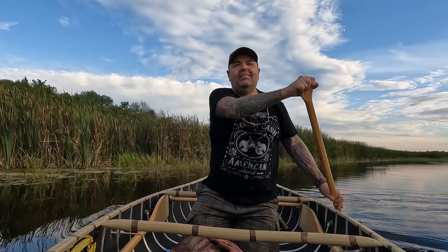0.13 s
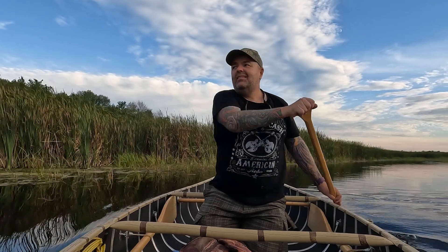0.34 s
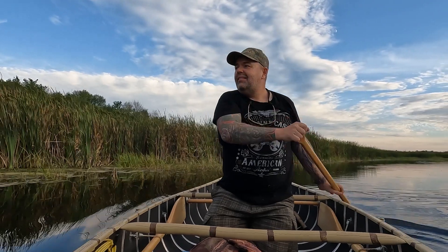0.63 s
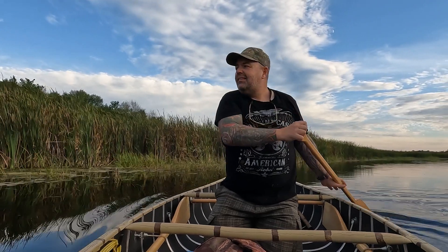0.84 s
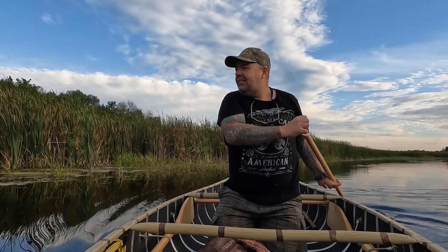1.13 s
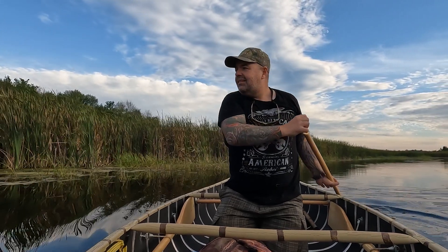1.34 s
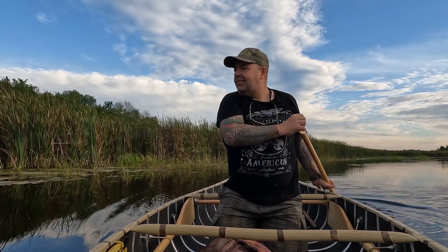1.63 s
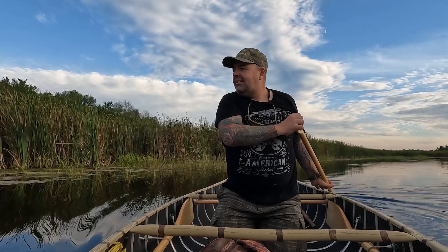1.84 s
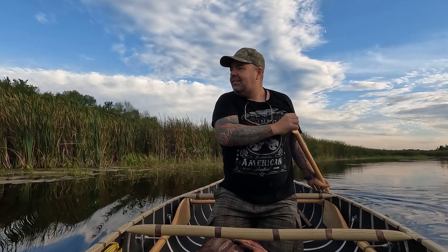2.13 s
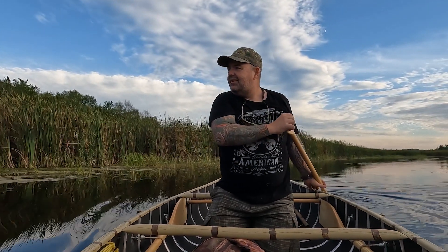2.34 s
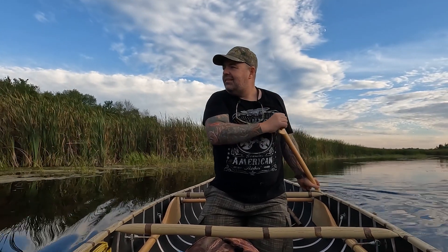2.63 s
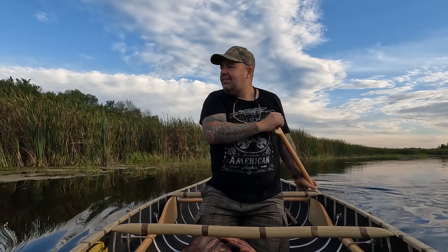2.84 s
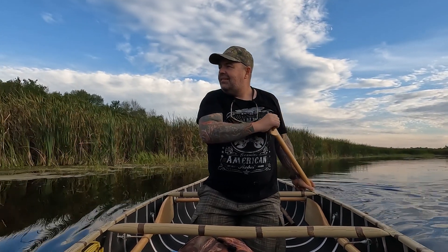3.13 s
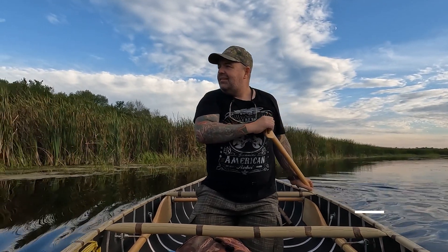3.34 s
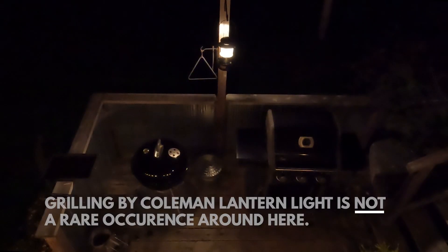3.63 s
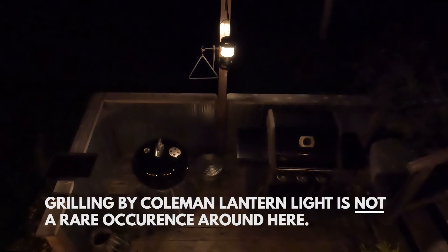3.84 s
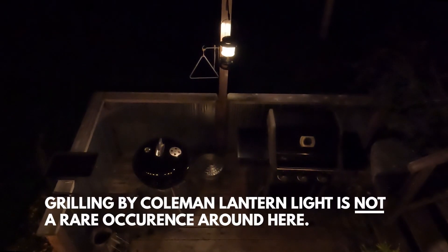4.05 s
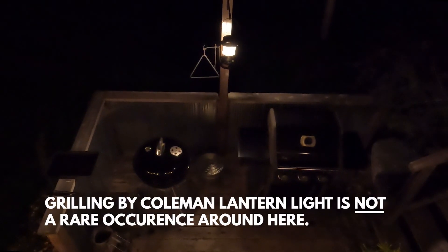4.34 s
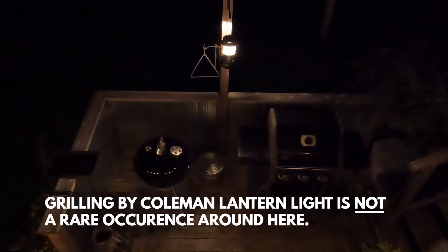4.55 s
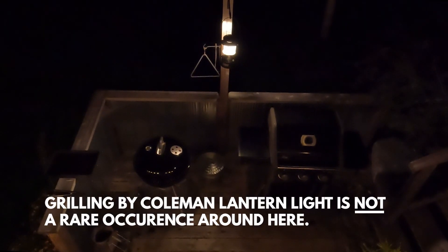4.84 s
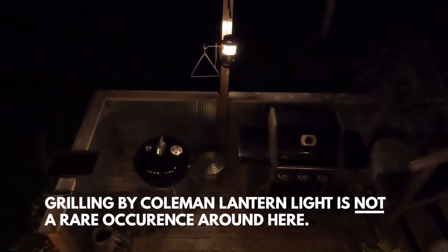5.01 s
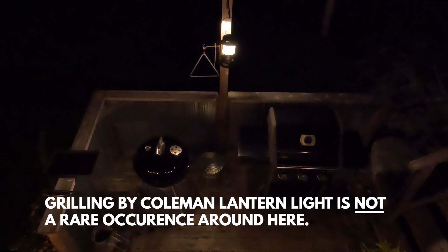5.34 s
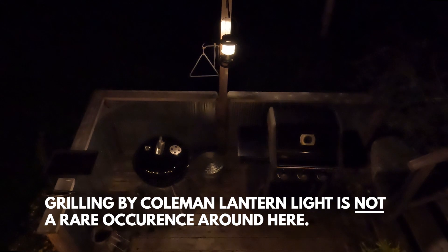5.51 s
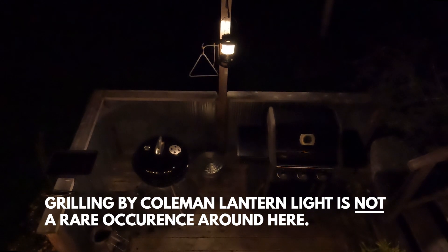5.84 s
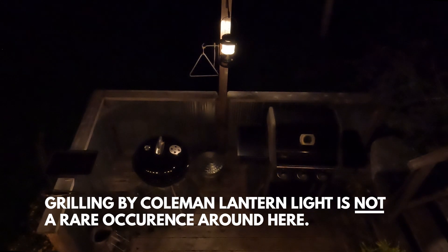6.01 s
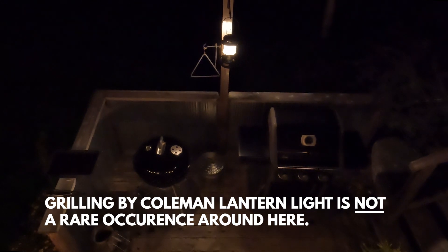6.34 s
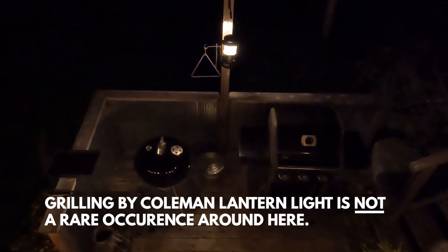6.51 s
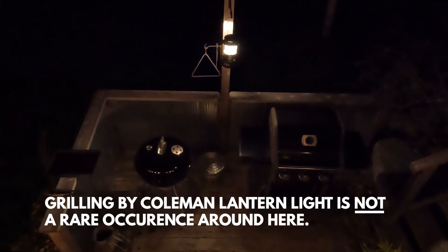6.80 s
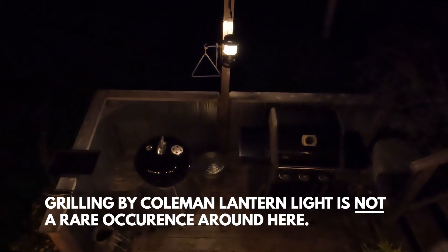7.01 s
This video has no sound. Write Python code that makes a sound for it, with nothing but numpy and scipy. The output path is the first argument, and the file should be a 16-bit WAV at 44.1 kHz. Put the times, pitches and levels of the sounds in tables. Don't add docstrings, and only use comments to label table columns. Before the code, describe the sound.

First, liquid swirling and bubbling from a canoe paddle, small droplets ticking on the surface, then near calm with low breeze rumble and faint catlike bird calls. Halfway through, a summer night chorus rises within a fraction of a second: tree crickets trilling in rhythmic chirps, a higher field cricket, a dry rapid katydid rasp and airy hiss. Close and wet at first, then open garden air with slight leafy echo.

```python
import sys
import numpy as np
from scipy import signal
from scipy.fft import rfft, irfft, next_fast_len
from scipy.io import wavfile

SR = 44100
rng = np.random.default_rng(int(sys.argv[2]) if len(sys.argv) > 2 else 0)


def invert_db(x):
    u = np.asarray(x, float) / 20
    return 10 ** u


def digitize_waveform(pressure):
    field = np.atleast_2d(pressure).T
    bounded = np.clip(field, -1, 1)
    quanta = np.round(bounded * 32767).astype(np.int16)
    wavfile.write(sys.argv[1], SR, quanta)


N = 316197
T = np.arange(N) / SR


def rms_one(x):
    return x / np.sqrt(np.mean(x ** 2) + 1e-20)


def in_time(rows):
    s, *columns = np.transpose(rows)
    return [np.interp(T, s, c, left=-140, right=-140 if s[-1] < 7 else c[-1]) for c in columns]


def drift(rate):
    r = np.exp(-80 * np.pi * rate / SR)
    chance = rng.standard_normal(N // 40 + 2002)
    slow = signal.lfilter([1], [1, -2 * r, r * r], chance)[2000:]
    return np.interp(np.arange(N) / 40, np.arange(len(slow)), rms_one(slow))


def band(x, low_hz, high_hz):
    return signal.sosfilt(signal.butter(2, [low_hz, high_hz], "band", fs=SR, output="sos"), x)


def lowpass(x, order, top_hz):
    return signal.sosfilt(signal.butter(order, top_hz, fs=SR, output="sos"), x)


def resonance(x, hz, width_hz):
    r = np.exp(-np.pi * width_hz / SR)
    feedback = [1, -2 * r * np.cos(2 * np.pi * hz / SR), r * r]
    return signal.lfilter([(1 - r * r) / 2, 0, (r * r - 1) / 2], feedback, x)


def noise(colour, patchy_db=0, rate=20):
    hz, level_db = np.transpose(colour)
    size = next_fast_len(N)
    grid = np.maximum(np.fft.rfftfreq(size, 1 / SR), 1)
    white = rng.standard_normal(N)
    if patchy_db:
        edges = 110 * 2 ** np.arange(0, 7.1, .7)
        together = drift(rate)
        early = slice(2 * SR)
        patches = 0
        for low_hz, high_hz in zip(edges, edges[1:]):
            flicker = invert_db(patchy_db * (together + drift(rate))[early])
            patches = patches + band(white[early], low_hz, high_hz) * flicker
        white[early] = patches
    gain = invert_db(np.interp(np.log(grid), np.log(hz), level_db, left=-90, right=-90))
    return rms_one(irfft(rfft(white, size) * gain, size)[:N])


def add(out, s, peak_db, hz, fall_hz, length, skew=1.0, blunt=1.0, bend=0.89, overtone_db=-90):
    size = max(int(length * SR), 8)
    u = np.arange(size) / size
    phase = 2 * np.pi * np.cumsum(hz + fall_hz * (1 / (1 + bend) - u ** bend)) / SR
    stroke = invert_db(peak_db) * np.sin(np.pi * u ** skew) ** blunt * np.sin(phase)
    if overtone_db > -80:
        stroke = stroke * (1 + 2 * invert_db(overtone_db) * np.cos(phase))
    start = max(int((s - length * .5 ** (1 / skew)) * SR), 0)
    out[start:start + size] += stroke[:max(N - start, 0)]


def scatter(x, t60, wet_db):
    t = np.arange(int(t60 * SR)) / SR
    tail = rng.standard_normal(len(t)) * invert_db(-60 * t / t60) * (t > .004)
    return x + invert_db(wet_db) * signal.oaconvolve(x, tail / np.sqrt(np.sum(tail ** 2)))[:N]


# (frequency [Hz], level [dB per Hz])
SLOSH_COLOUR = [(120, -36), (248, 8.5), (382, -16), (521, 3.5), (2000, -8), (2400, -24), (3900, -31),
                (6600, -120)]
# (frequency [Hz], level [dB per Hz])
SPRAY_COLOUR = [(1500, -18), (2030, 8), (3590, 2), (4050, -12), (7030, -16.5), (8930, -20), (11900, -34),
                (13500, -61)]


def slosh_and_spray():
    small = np.zeros(N)
    for when, pitch, size in rng.random((1100, 3)):
        hz = 380 * 12 ** pitch
        peak_db = -3.5 * np.log(1 - 0.66 * size) - 4 * np.log2(hz / 600)
        add(small, 1.7 * when, peak_db, hz, -.12 * hz, 5.4 / hz, skew=0.622, blunt=4.4)
    low = lowpass(small, 2, 1600)
    slosh = invert_db(0.5) * noise(SLOSH_COLOUR, patchy_db=2.5, rate=28.6) + invert_db(-10.5) * rms_one(low)
    landings = rng.random(N) < 450 * (T < 1.6) / SR
    spatter = landings * invert_db(3.5 * np.minimum(rng.exponential(1, N), 2.5))
    crackle = 1 + 1.5 * signal.oaconvolve(spatter, np.exp(-np.arange(300) / 30.0))[:N]
    hissing = rms_one((crackle * noise(SPRAY_COLOUR, patchy_db=3.5, rate=54))[:2 * SR])
    spray = invert_db(-5.5) * rms_one(small - low)
    spray[:2 * SR] += invert_db(-3.5) * hissing
    return slosh, spray


# (time [s], pitch [Hz], peak level [dB])
BUBBLES = [(0.081, 324, -18), (0.088, 1255, -14.5), (0.119, 1660, -29), (0.156, 1100, -24),
           (0.274, 3170, -31), (0.278, 605, -18.5), (0.303, 766, -24), (0.408, 486, -25), (0.5, 865, -19.5),
           (0.545, 4000, -30), (0.582, 1970, -21), (0.583, 840, -21), (0.601, 1300, -22),
           (0.818, 2880, -34), (0.843, 2000, -25), (0.883, 2770, -24.5), (0.947, 3250, -23.5),
           (0.953, 365, -25.5), (0.96, 2380, -26.5), (1.005, 1620, -31), (1.008, 735, -24.5),
           (1.03, 1550, -30), (1.048, 2040, -26), (1.127, 3660, -27), (1.129, 560, -29), (1.168, 335, -24),
           (1.177, 1360, -36), (1.135, 267, -20), (1.14, 2540, -33), (1.155, 213, -20.5), (1.199, 790, -25),
           (1.214, 2050, -34)]
# (time [s], pitch [Hz], peak level [dB])
DEEP_BUBBLES = [(0.327, 1005, -27), (0.536, 2380, -34), (.635, 1090, -37), (0.735, 580, -31),
                (0.771, 1435, -35), (0.926, 1070, -28.5), (0.993, 4700, -37), (1.095, 3120, -34),
                (1.174, 644, -29), (1.196, 184, -29.5), (1.571, 870, -39), (1.588, 830, -46),
                (2.33, 1530, -48), (3.043, 2220, -42.5), (3.633, 865, -43)]
# (time [s], pitch [Hz], peak level [dB])
DRIPS = [(1.334, 1770, -35), (1.475, 845, -35), (1.476, 2230, -30), (1.509, 1140, -32.5),
         (1.646, 2320, -34), (2.478, 1650, -42.5), (2.477, 620, -42), (2.452, 5560, -48),
         (2.891, 2820, -47), (2.893, 3700, -47), (2.898, 4700, -45)]
# (time [s], pitch [Hz], peak level [dB], length [ms])
HULL_SLOPS = [
    (.205, 175, -34, 75),
    (0.33, 300, -29, 17.8),
    (0.016, 920, -34, 13.7),
    (0.025, 560, -46, 23),
    (.515, 1400, -25, 12.4),
]


def bubbles():
    out = np.zeros(N)
    timed = []
    for table, ring_on in [(BUBBLES + DRIPS, 1), (DEEP_BUBBLES, 2.85)]:
        for s, hz, db in table:
            ms = ring_on * 5.34 * (1000 / hz) ** 0.62
            timed.append((s, hz, db, ms))
    for s, hz, peak_db, ms in timed + HULL_SLOPS:
        add(out, s, peak_db - 3.0, hz, -min(.22 * hz, 260), 0.0014 * ms, skew=0.5, blunt=1.2)
    return out


# (time [s], pitch [Hz], peak level [dB])
SPITS = [(0.0167, 7580.0, -56.0), (0.066, 7750.0, -55), (0.0711, 6330, -55.0), (0.0784, 3720, -34.5),
         (0.0834, 5170.0, -42), (0.119, 3500, -38), (0.1205, 7060.0, -48), (0.162, 2600, -36),
         (0.1627, 5170.0, -42.0), (0.1821, 5510.0, -50), (0.4484, 3850, -37), (0.4666, 6500, -48),
         (0.4905, 4310.0, -42), (0.5007, 6370.0, -56), (0.5595, 4650.0, -42), (0.5924, 3080, -42),
         (0.7576, 6200.0, -49), (0.8432, 4480.0, -55), (0.8882, 5130, -42), (0.9368, 5230, -45),
         (1.0224, 5000.0, -43), (1.1291, 4820.0, -40), (1.1298, 7060.0, -54), (1.3395, 6720.0, -54),
         (1.3765, 4480.0, -50), (1.4309, 4650.0, -54), (1.485, 2940, -40), (1.6847, 3110, -44)]


def spits():
    out = np.zeros(N)
    for s, hz, peak_db in SPITS:
        add(out, s, peak_db + 1, hz, -.1 * hz, .0045, skew=0.85)
    return out


# (time [s], length [s], level [dB], top frequency [Hz])
SURGES = [(.02, 0.054, -36, 4700), (0.121, 0.017, -33.5, 4380), (0.166, 0.029, -42, 4900),
          (0.331, 0.046, -39, 2370), (0.507, 0.052, -29.5, 2560), (0.589, 0.047, -29, 2760),
          (0.759, 0.052, -41, 3280), (0.835, 0.037, -43, 3350), (1.012, .09, -35.5, 4570),
          (1.182, 0.07, -47, 2500), (1.198, 0.051, -36, 4830), (1.49, 0.058, -48.5, 5230)]


def surges():
    out = np.zeros(N)
    for s, length, db, top_hz in SURGES:
        size = int(length * SR)
        grit = rng.standard_normal(5000) * invert_db(5.0 * np.repeat(rng.standard_normal(100), 50))
        broad = band(band(grit, 260, top_hz), 250, 1.23 * top_hz)
        burst = rms_one(broad + 6.0 * band(grit, 355, 0.5 * top_hz))[-size:]
        start = max(int((s - length / 2) * SR), 0)
        out[start:start + size] += invert_db(db) * burst * np.sin(np.pi * np.linspace(0, 1, size) ** 0.9)
    return out


# (time [s], peak level [dB])
DROPS = [(0.1196, -39), (0.1618, -26), (0.274, -30), (0.544, -24), (0.592, -39), (0.757, -41),
         (0.8802, -32), (0.9182, -27.5), (0.9456, -27), (1.126, -27), (1.199, -31), (1.214, -37),
         (1.3332, -30.5), (1.3743, -40), (1.477, -34), (1.5097, -37), (1.685, -29.5), (3.4411, -45)]


def drops():
    clicks = np.zeros(N)
    clicks[[int(s * SR) for s, db in DROPS]] = invert_db(np.array(DROPS)[:, 1] + 7)
    burst = rng.standard_normal(200) * np.exp(-np.arange(200) / 20)
    return band(band(signal.oaconvolve(clicks, burst)[:N], 1500, 4800), 1800, 12400)


# (time [s], slosh level [dB], spray level against the slosh [dB])
STROKE = [
    (0.0, -27.5, 0),
    (0.19, -31.5, -43),
    (0.22, -46.5, 3),
    (0.27, -31.5, -18),
    (1.118, -35, -3.5),
    (1.132, -31, -2.5),
    (1.282, -48, -5.5),
    (1.8, -55.5, -1),
]


def paddle():
    slosh_db, spray_db = in_time(STROKE)
    slosh, spray = slosh_and_spray()
    bright = invert_db(slosh_db + spray_db - 3) * spray + drops() + surges()
    dull = lowpass(bright, 6, 6800)
    top = invert_db(-2.5) * band(band(bright, 9600, 13000), 9600, 13000)
    return invert_db(slosh_db - 5.5) * slosh + bubbles() + spits() + dull + top


# (frequency [Hz], level [dB per Hz])
BREEZE_COLOUR = [(22, -32), (50, -21), (69, -11), (108, -4), (140, 4.5), (253, -1), (473, -25),
                 (600, -13.5), (850, -40)]
# (frequency [Hz], level [dB per Hz])
HISS_COLOUR = [(240, 7), (400, 2.5), (1500, -8.5), (3480, -8.5), (3920, -15), (4700, -14.5), (5340, -14),
               (5800, -20.5), (7270, -28), (9070, -44.5), (11800, -33.5), (13500, -62)]
# (time [s], level [dB])
BREEZE = [
    (0.0, -61),
    (1.6, -60),
    (1.95, -63),
    (2.25, -64.5),
    (2.45, -59.5),
    (2.9, -59),
    (3.25, -55),
    (3.5, -57.5),
    (4.05, -61.5),
    (4.5, -84),
]


def lake_air():
    stirred_db = 11 * np.clip(1 - T / 1.8, 0, 1)
    fade_db = 80 * np.maximum(T - 3.99, 0)
    hum = rms_one(resonance(resonance(rng.standard_normal(N), 83, 12), 83, 14))
    breeze = invert_db(2.0 * drift(7.8)) * noise(BREEZE_COLOUR) + invert_db(-8.0) * hum
    hiss = noise(HISS_COLOUR)
    hiss = hiss - 0.71 * resonance(hiss, 9100, 700)
    return invert_db(in_time(BREEZE)[0] + 7.0) * breeze + invert_db(-54.5 + stirred_db - fade_db) * hiss


# (time [s], length [s], top pitch [Hz], level [dB], hoarseness [0-1])
MEWS = [
    (0.227, 0.33, 893, -55.5, 0.64),
    (0.872, 0.22, 893, -54, 0.4),
    (1.513, 0.36, 882, -57, 0.26),
    (2.028, 0.41, 932, -67, 0.54),
    (2.199, 0.3, 889, -55.5, 0.34),
    (2.67, 0.23, 870, -78, 0.47),
    (3.028, 0.2, 932, -68, 0.3),
    (3.26, 0.12, 840, -72, .3),
    (4.037, 0.24, 886, -61, 0.2),
]
# (multiple of the pitch, level [dB])
MEW_PARTIALS = [(3, -10), (4, 0), (5, -21), (7, -31), (8, -19)]


def bird():
    out, wobble, gusts = np.zeros(N), drift(55), drift(8.7)
    for s, length, hz, level_db, hoarse in MEWS:
        on = slice(int(s * SR), int((s + length) * SR))
        u = (T[on] - T[on][0]) / length
        rough = hoarse * (0.36 + 3.3 * u ** 3) * wobble[on]
        glide = 1.014 - .2 * np.exp(-u / .028) - .105 * u ** 1.1 - .12 * u ** 22
        phase = 2 * np.pi * np.cumsum(hz * glide * (1 + .018 * rough)) / SR
        shape = np.clip(u / 0.035, 0, 1) * np.clip((1 - u) / 0.026, 0, 1)
        shape = shape * invert_db(-5 * u + 6.5 * np.minimum(rough, .55))
        far_db = 0.23 * (level_db + 50.5)
        partials = sum(invert_db(db + k * far_db) * np.sin(k * phase) for k, db in MEW_PARTIALS)
        out[on] += invert_db(level_db + 9.0 - 3.3 * far_db + .7 * far_db * gusts[on]) * shape * partials
    return scatter(out, 1.0, -7.5)


# (time [s], level [dB])
NIGHT = [
    (3.43, -84),
    (3.5, -62),
    (3.62, -52.5),
    (4.18, -43.5),
    (7.17, -43.5),
]


def night_fade():
    return in_time(NIGHT)[0]


# (frequency [Hz], level [dB per Hz])
NIGHT_HISS = [(20, -23.5), (45, -24.5), (120, -26.5), (284, -33.5), (631, -22.5), (1440, -24.5),
              (2200, -1.5), (3000, -20), (3400, -31), (4450, -16.5), (5600, -11.5), (7600, -26),
              (11500, -30.5), (15900, -39)]


def night_hiss():
    return noise(NIGHT_HISS)


# (first pause [s], last pause [s], number of pauses)
SHAKER_BOUTS = [(3.56, 3.667, 3), (3.746, 3.844, 3), (3.922, 4.121, 5), (4.153, 4.425, 7), (4.49, 4.684, 5),
                (4.762, 5.088, 7), (5.14, 5.264, 3), (5.306, 5.488, 5), (5.56, 5.754, 5), (5.79, 6.197, 10),
                (6.272, 6.373, 3), (6.444, 6.611, 4), (6.671, 6.822, 4), (6.884, 7.073, 4)]


def shaker():
    pauses = np.zeros(N)
    for first, last, count in SHAKER_BOUTS:
        for s in np.linspace(first, last, count):
            pauses[int((s - .019) * SR)] = 1
    dips = signal.oaconvolve(pauses, np.hanning(int(0.036 * SR)))[:N]
    envelope = 1 - np.clip(2.4 * dips, 0, 1)
    rasp = band(band(rng.standard_normal(N), 4900, 9400), 6700, 10200)
    rasp = rasp + 0.48 * resonance(rasp, 7750, 250) + 1.6 * resonance(rasp, 9700, 200)
    return envelope * invert_db(0.8 * drift(7.7)) * rms_one(rasp)


def trill(hz, fall_hz, per_s, length, count):
    out = np.zeros(N)
    for voice in range(count):
        draws = rng.standard_normal((700, 2))
        times = 3.4 + np.cumsum(1 + .08 * draws[:, 0]) / (per_s * (1 + .06 * voice))
        for s, chance in zip(times[times < N / SR], draws[:, 1]):
            add(out, s, chance, hz * (1 - 0.015 * voice), fall_hz, length, overtone_db=-17.5)
    return out / np.std(out[-SR:])


def faint_singers():
    buzz = invert_db(-4.0) * trill(5603, 820, 72, .007, count=3)
    thin = invert_db(-3.5 + 1.4 * drift(8.1)) * trill(2886, 445, 52, .012, count=2)
    top = np.zeros(N)
    for s, db in HIGH_TREE_CRICKET:
        add(top, s, db + 15, 15600, 400, .011)
    return scatter(buzz + thin, 0.12, -8.0) + top


# (first stroke [s], last stroke [s])
KATYDID_RUNS = [(3.44, 3.5145), (3.5223, 3.5447), (3.5537, 3.7721), (3.7842, 4.1505), (4.1606, 4.1835),
                (4.1958, 4.2989), (4.3115, 4.4455), (4.4573, 4.5483), (4.5605, 4.5969), (4.6074, 4.7479),
                (4.7591, 4.8937), (4.9027, 4.9562), (4.9683, 5.042), (5.0534, 5.3391), (5.3524, 5.3676),
                (5.38, 5.4978), (5.5087, 5.6432), (5.6553, 5.7155), (5.7245, 5.7462), (5.7584, 5.7949),
                (5.806, 5.9392), (5.9512, 6.0935), (6.1035, 6.1494), (6.1616, 6.25), (6.2598, 6.3937),
                (6.405, 6.5184), (6.5307, 6.6994), (6.7095, 6.9198), (6.932, 6.9982), (7.011, 7.1447),
                (7.1559, 7.1634)]
KATYDID_BREAKS = [3.399, 3.78, 4.191, 4.555, 4.964, 5.346, 5.754, 6.156, 6.53, 6.928, 7.3]
# (frequency [Hz], width [Hz], level [dB])
KATYDID_WING = [(8950, 1400, 23.5), (10300, 280, -13), (11200, 1500, 13.5), (12300, 130, -17.5),
                (11360, 600, -11), (12900, 470, -33)]


def katydid():
    closing, ringing = np.zeros(N), np.zeros(N)
    gap_s = .00746
    runs = [np.linspace(a, b, round((b - a) / gap_s) + 1) for a, b in KATYDID_RUNS]
    times = np.concatenate(runs)
    phrase = np.interp(times, KATYDID_BREAKS, np.arange(len(KATYDID_BREAKS))) % 1
    for s, u, (late, loud, slip) in zip(times, phrase, rng.standard_normal((600, 3))):
        add(closing, s + 6e-5 * late, 1.2 * loud, 11000, 4800, .0024, blunt=0.58)
        add(closing, s + 0.0047 + 2e-4 * slip, -9 + late, 11600, 3500, .002, blunt=0.55)
        for hz in (10600 + 220 * u ** 2, 11450):
            add(ringing, s + .0005, -10 + 9 * u ** .7 + .8 * slip, hz, 60, .0072, skew=.6)
    wing = np.zeros(N)
    for k, (hz, width_hz, db) in enumerate(KATYDID_WING):
        wing += (-1) ** k * invert_db(db) * resonance(closing, hz, width_hz)
    song = invert_db(-7) * rms_one(closing) + rms_one(wing) + invert_db(-1.5) * rms_one(ringing)
    song = song - .75 * resonance(song, 10280, 300) - .7 * resonance(song, 11780, 200)
    song = band(song, 8600, 16000)
    return scatter(song / np.std(song[-SR:]), 0.14, -17)


def chirps(table, hz, fall_hz, per_s, overtone_db):
    out = np.zeros(N)
    for start, length, db in table:
        draws = rng.standard_normal((16, 2))
        gaps = (1 + .3 * (np.arange(16) % 3 == 2) + 0.12 * draws[:, 0]) / per_s
        for s, chance in zip(start + np.cumsum(gaps) - gaps[0] / 2, draws[:, 1]):
            if s < start + length:
                build_db = -7 * np.exp(-(s - start) / 0.021)
                pitch = hz * (1 + 0.0082 * chance) + 4 * build_db
                add(out, s, db + build_db + 2.0 * chance, pitch, fall_hz, .018,
                    blunt=0.39, overtone_db=overtone_db)
    return out


# (time [s], level [dB])
CHORUS = [(3.45, -64), (3.63, -43), (4.07, -38.5), (4.26, -58), (4.34, -36.5), (4.79, -36), (4.96, -41),
          (5.2, -33.5), (5.72, -44.5), (5.85, -33), (6.36, -43), (6.63, -32.5), (6.91, -38.5), (6.99, -59),
          (7.17, -33)]
# (time [s], length [s], level [dB])
FAR_FIELD_CRICKET = [
    (3.56, 0.059, -43.5),
    (3.93, 0.16, -35.5),
    (4.05, 0.11, -40.5),
    (4.45, 0.19, -38.5),
    (4.86, 0.15, -36.5),
    (5.27, .06, -35),
    (5.88, 0.24, -35.5),
    (6.33, 0.24, -35),
    (6.78, 0.27, -36.5),
]


def far_crickets():
    trees = invert_db(in_time(CHORUS)[0] - 1.5) * trill(2060.0, 150, 41, .018, count=2)
    field = invert_db(-3.5) * chirps(FAR_FIELD_CRICKET, 4510, 310, 50, -90)
    return scatter(trees, 0.15, -2.0) + scatter(field, 0.24, -.5)


# (time [s], strokes, strokes before the first hitch, level [dB])
NEAR_TREE_CRICKET = [
    (3.482, 8, 3, -23),
    (3.94, 7, 4, -22),
    (4.461, 6, 2, -22.5),
    (4.871, 7, 3, -22),
    (5.315, 8, 2, -21.5),
    (5.8, 6, 3, -22.5),
    (6.298, 6, 2, -23),
    (6.73, 5, 2, -21.5),
    (7.151, 1, 2, -20),
]


def near_tree_cricket():
    out = np.zeros(N)
    for start, strokes, lead, db in NEAR_TREE_CRICKET:
        k = np.arange(round(strokes))
        hitch = (k >= round(lead)) & ((k - round(lead)) % 3 == 0)
        late, loud = rng.standard_normal((12, 2))[k].T
        times = start + .0235 * k + .008 * np.cumsum(hitch) + 0.00119 * late
        levels_db = db - 5 * np.exp(-k / 0.32) - 7.5 * hitch * (k == k[-1]) + 0.49 * loud
        for s, level_db in zip(times, levels_db):
            add(out, s, level_db, 2310, 250, .023, skew=.8, blunt=0.85, overtone_db=-36)
    return invert_db(night_fade() - NIGHT[-1][1]) * out


# (time [s], peak level [dB])
LOW_TREE_CRICKET = [(3.612, -40), (3.636, -40), (3.667, -38), (3.708, -37), (3.735, -39), (3.756, -35),
                    (4.185, -35), (4.206, -27.5), (4.243, -27.5), (4.275, -29), (4.3, -28), (4.336, -30),
                    (4.363, -30.5), (4.39, -28.0), (4.801, -30), (4.822, -35), (4.842, -31.5), (4.887, -30),
                    (4.905, -29.5), (4.935, -32), (4.968, -30), (5.336, -46), (5.352, -33.0),
                    (5.383, -27.5), (5.415, -28), (5.447, -28.5), (5.48, -28.5), (5.511, -29.5),
                    (5.543, -27.5), (5.572, -29), (5.598, -34), (5.988, -33), (6.007, -35), (6.028, -32),
                    (6.056, -32), (6.095, -30.5), (6.116, -30), (6.15, -27.5), (6.177, -28), (6.217, -30),
                    (6.597, -44), (6.622, -34), (6.657, -30), (6.686, -33), (6.715, -31), (6.753, -31),
                    (6.786, -30.5), (6.816, -31.5), (6.845, -34), (6.863, -48)]
# (time [s], peak level [dB])
HIGH_TREE_CRICKET = [(3.791, -31), (3.84, -34), (3.863, -32), (3.88, -33), (3.91, -30.5), (3.928, -29.5),
                     (3.963, -31), (4.012, -31.0), (4.295, -35), (4.325, -29.0), (4.344, -28),
                     (4.372, -22.5), (4.397, -25.0), (4.416, -26.0), (4.442, -23), (4.477, -26), (4.5, -27),
                     (4.891, -26), (4.912, -25.0), (4.935, -23), (4.967, -24), (4.995, -28), (5.342, -30),
                     (5.372, -33), (5.39, -27), (5.419, -28), (5.441, -26), (5.46, -27), (5.483, -30),
                     (5.501, -31), (5.527, -26.5), (5.55, -34), (5.569, -26), (5.89, -28), (5.906, -26),
                     (5.956, -28), (5.982, -26.5), (6.004, -24), (6.027, -25), (6.067, -28.5), (6.096, -28),
                     (6.121, -29), (6.401, -30), (6.423, -31), (6.449, -26.5), (6.477, -24), (6.505, -28.5),
                     (6.53, -32), (6.571, -29), (6.603, -27), (6.622, -33), (6.646, -26.5), (6.936, -27.5),
                     (6.966, -29), (6.985, -25.5), (7.021, -25.5), (7.055, -26.0), (7.079, -27),
                     (7.104, -31), (7.127, -27)]


def low_and_high_tree_crickets():
    out = np.zeros(N)
    for (s, db), slip in zip(LOW_TREE_CRICKET, rng.standard_normal(70)):
        add(out, s, db + 0.1, 1875 + 20 * slip, 230, .022, skew=.85, blunt=0.94, overtone_db=-18.5)
    for (s, db), slip in zip(HIGH_TREE_CRICKET, rng.standard_normal(70)):
        add(out, s, db + 0.5, 2490 + 16 * slip, 260, .023, skew=.85, overtone_db=-22)
    return out


# (time [s], length [ms], peak level [dB])
FIELD_CRICKET = [(3.7721, 7.9, -34), (3.787, 5.3, -31), (3.8043, 8.5, -30), (3.8228, 9.7, -28),
                 (3.8458, 12, -30), (3.869, 9, -28.5), (3.89, 13, -29.5), (4.274, 14.5, -27),
                 (4.302, 12.5, -26.5), (4.327, 8.2, -23.5), (4.3452, 11.2, -25.5), (4.3661, 11.7, -26),
                 (4.3878, 11, -25.5), (4.41, 7.3, -23), (4.655, 11, -37), (4.709, 15, -35),
                 (4.798, 18, -33), (5.0975, 8.0, -27.5), (5.114, 8.2, -25.5), (5.132, 11, -24.5),
                 (5.1525, 10.2, -25), (5.1726, 10.9, -24), (5.196, 12.9, -26), (5.2191, 11.2, -25),
                 (5.2434, 13, -26.5), (5.6423, 6.3, -27), (5.655, 3.4, -30.0), (5.677, 7.4, -26.5),
                 (5.689, 4.5, -24), (5.7108, 9.8, -25), (5.7298, 11.4, -25), (5.7518, 11.5, -26),
                 (5.774, 12.5, -25), (5.802, 11.5, -32), (6.0776, 7.6, -27), (6.1014, 7.2, -26),
                 (6.126, 7.9, -22.5), (6.1471, 9.7, -25), (6.167, 10.3, -25), (6.188, 11.7, -26),
                 (6.2096, 11, -25), (6.531, 7.9, -29.0), (6.543, 6.5, -29), (6.5626, 5.1, -28),
                 (6.583, 7.5, -25.5), (6.602, 9.4, -26), (6.6244, 11.3, -25.5), (6.645, 11.3, -26),
                 (6.6684, 11, -24), (6.709, 9.7, -25)]


def field_cricket():
    out = np.zeros(N)
    began = last = 0
    for s, ms, db in FIELD_CRICKET:
        if s - last > .1:
            began = s
        last = s
        hz = 4540 - 110 * np.exp(-(s - began) / .05)
        add(out, s, db + .6, hz, 480, .00122 * ms, skew=.9, blunt=.45, bend=3.2)
    return out


def near_crickets():
    trees = near_tree_cricket() + low_and_high_tree_crickets()
    return scatter(trees, 0.17, -8) + scatter(field_cricket(), 0.45, -13.0)


def scene():
    lake = paddle() + lake_air() + bird()
    insects = invert_db(-1.06) * shaker() + faint_singers() + invert_db(2.0) * katydid()
    night = invert_db(night_fade()) * (invert_db(8) * night_hiss() + insects)
    return (lake + night + far_crickets() + near_crickets())[None]


def roll_off(x):
    return signal.sosfilt(signal.butter(12, 15800, fs=SR, output="sos"), x)


def record(dry):
    return roll_off(dry)


dry = scene()
out = record(dry)
digitize_waveform(out)
```